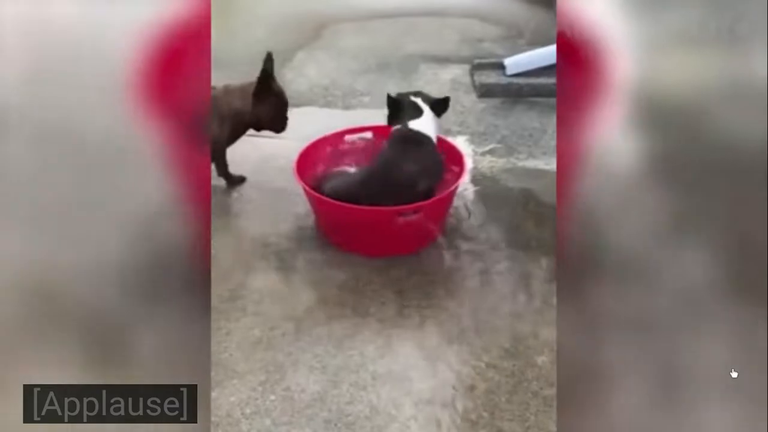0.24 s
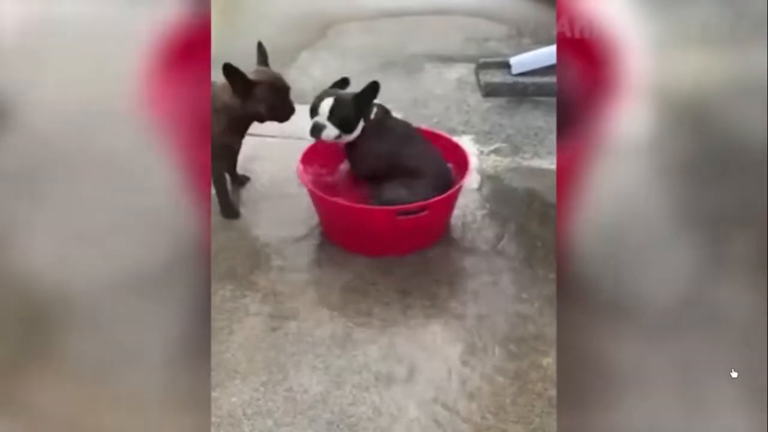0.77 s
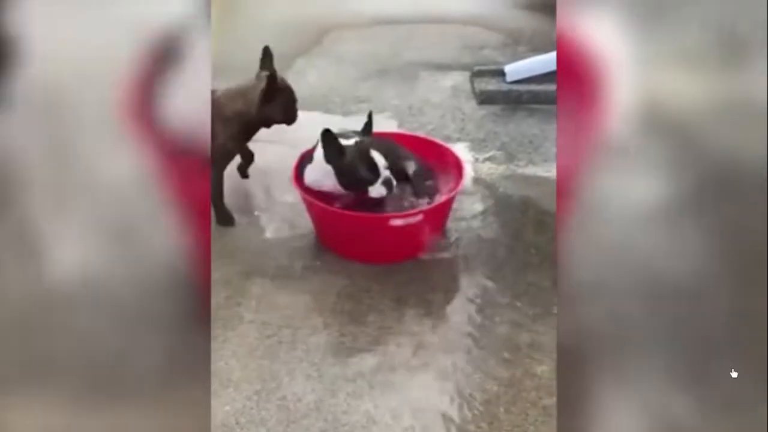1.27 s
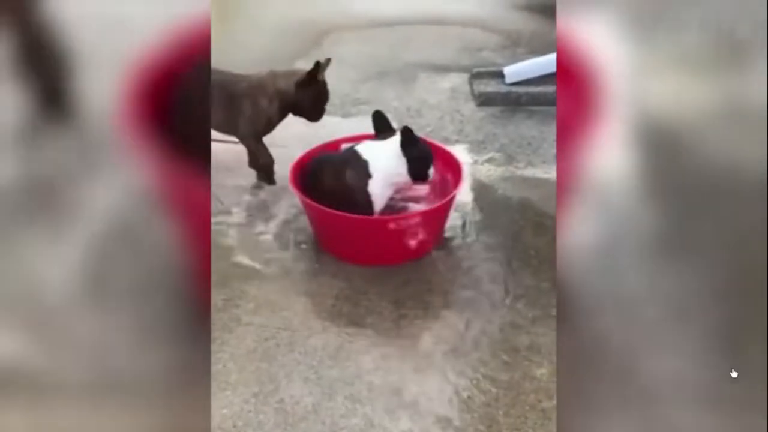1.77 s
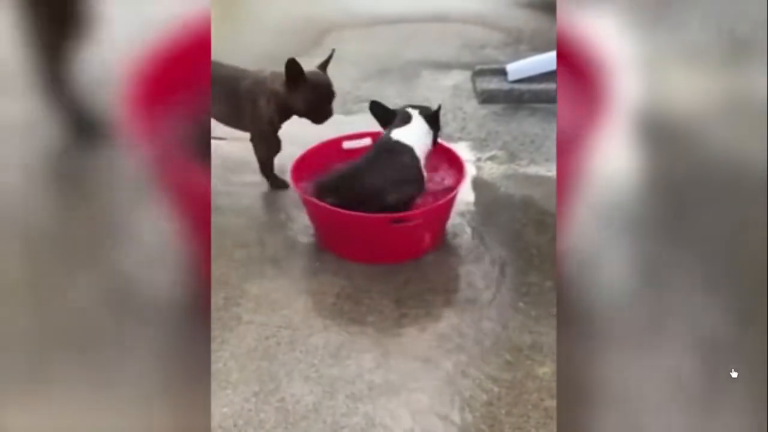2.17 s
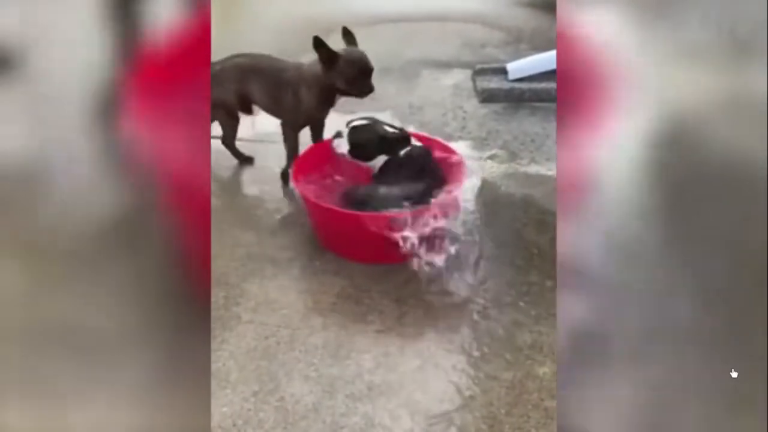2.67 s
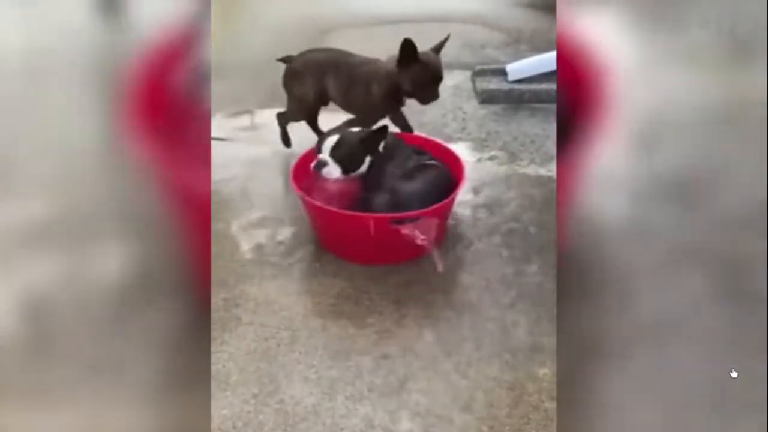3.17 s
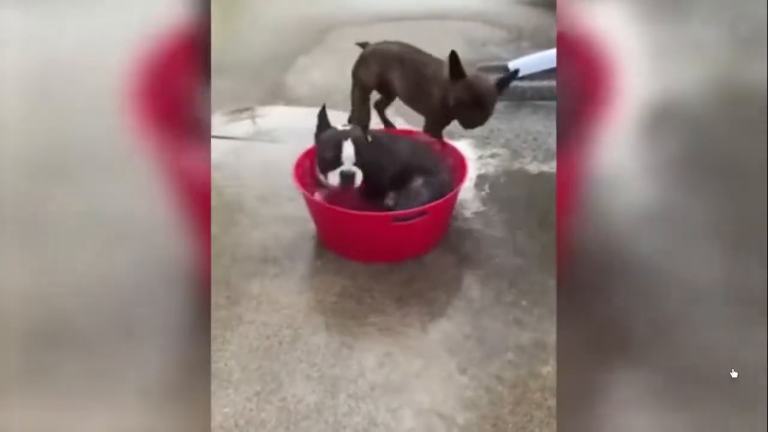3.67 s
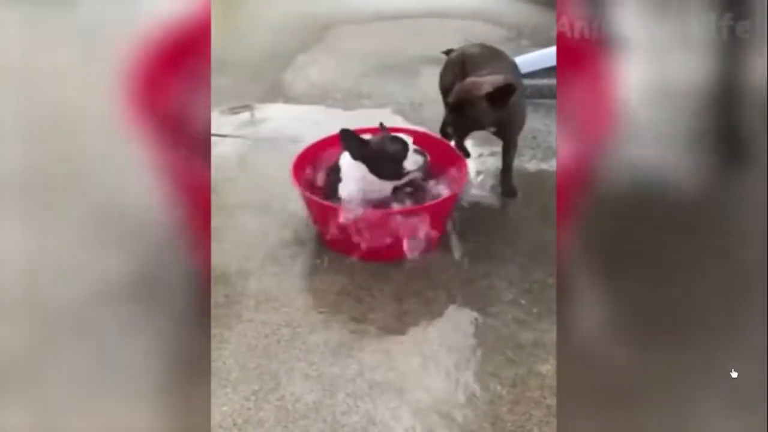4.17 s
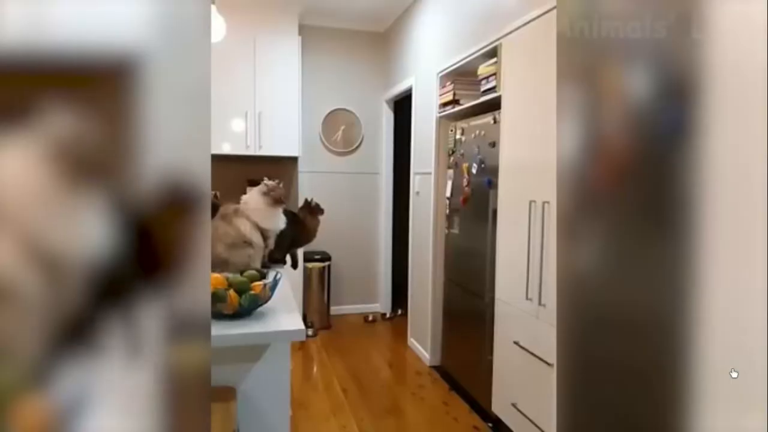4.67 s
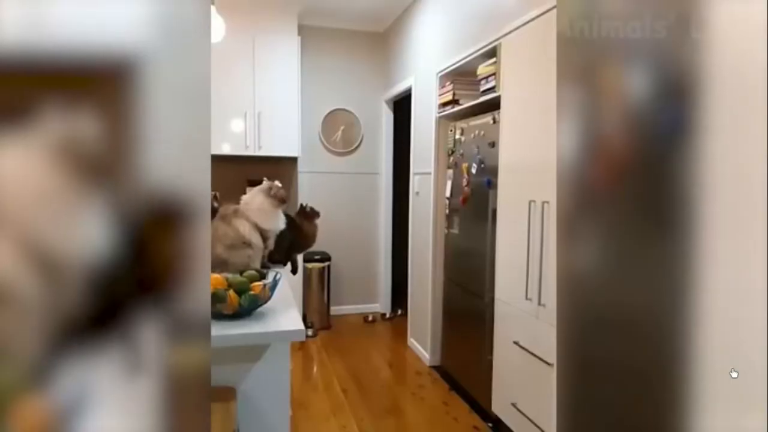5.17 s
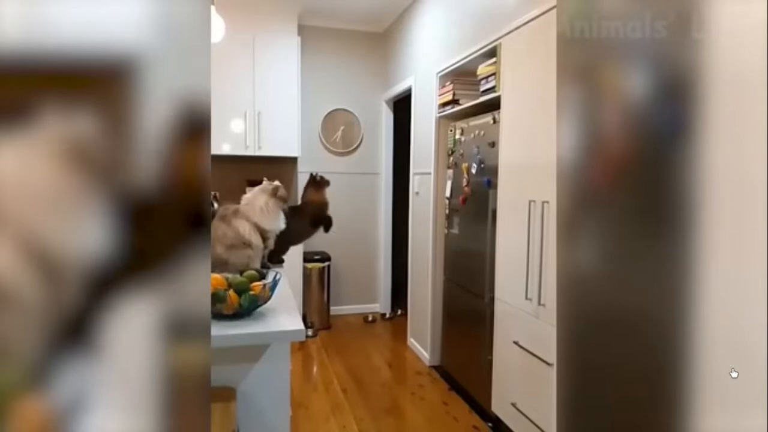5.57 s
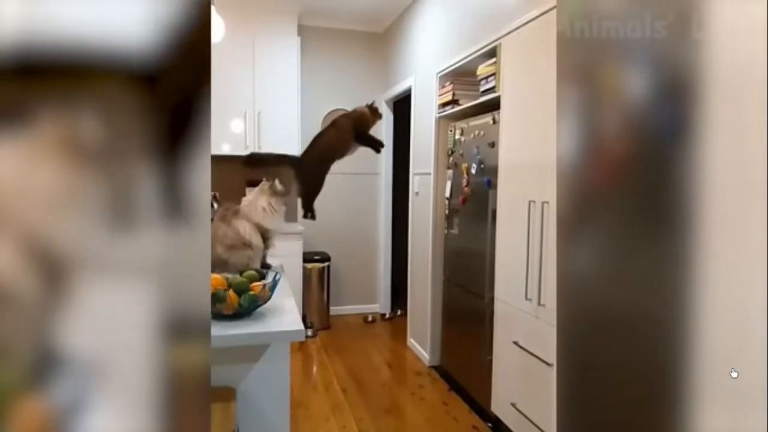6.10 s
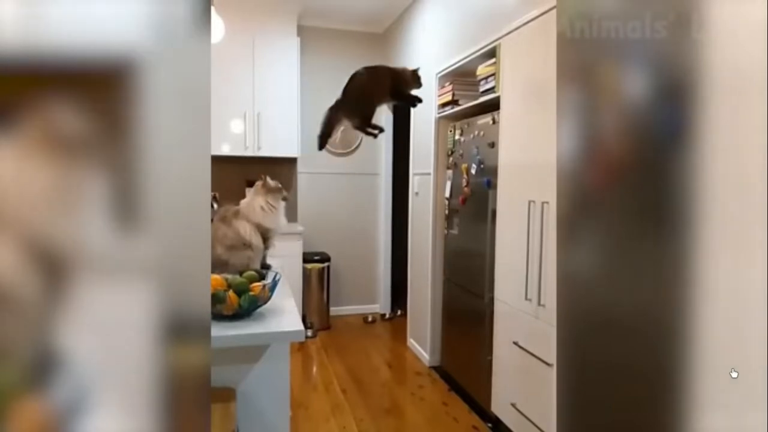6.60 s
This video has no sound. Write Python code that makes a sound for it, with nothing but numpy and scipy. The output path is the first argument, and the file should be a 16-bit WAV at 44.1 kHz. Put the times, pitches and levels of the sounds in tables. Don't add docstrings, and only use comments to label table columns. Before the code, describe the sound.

Loud, distorted splashing, gulping and sloshing in a little tub outdoors, suddenly giving way to quiet room tone with faint stirring.

```python
import sys
import numpy as np
from scipy import signal
from scipy.fft import rfft, irfft, next_fast_len
from scipy.io import wavfile
from scipy.ndimage import uniform_filter1d

SR = 44100
rng = np.random.default_rng(int(sys.argv[2]) if len(sys.argv) > 2 else 0)


def transcribe(signal):
    frames = np.atleast_2d(signal).T
    limited = np.clip(frames, -1, 1)
    pcm = np.round(limited * 32767).astype(np.int16)
    wavfile.write(sys.argv[1], SR, pcm)


def ratio(d):
    e = np.asarray(d, float) / 20
    return 10 ** e


N = 301644
TIME = np.arange(N) / SR
CUT_S = 4.745
EDGE_HZ = 12150
SURGE_STEP = 64
CALM_CHURN_DB = -23.5

# crest in seconds, churn level in dB,
# dying time in seconds, centre of the churn in Hz.
SHOVES = [(0.02, -21.5, 0.04, 1800.0), (0.1, -25.5, 0.031, 1510), (0.3, -21, 0.18, 2170),
          (0.438, -12, 0.1, 1750), (0.476, -29, 1, 1726), (0.56, -17.5, 0.092, 1093),
          (0.656, -13, 0.034, 2190.0), (0.79, -16.5, 0.048, 1050.0), (0.882, -12, 0.053, 1267),
          (1.086, -20, 0.016, 1667), (1.217, -22.5, 0.8, 1294), (1.528, -15, 0.14, 1764),
          (1.807, -18, 0.14, 1242), (2.005, -12, 0.058, 2040.0), (2.28, -22.5, 0.46, 1276),
          (2.482, -13, 0.097, 2000), (2.649, -15.5, 0.14, 1093), (2.839, -15.5, 0.49, 1506),
          (3.034, -7, 0.044, 2156), (3.122, -13, 0.14, 1630), (3.24, -17.5, 0.067, 2000.0),
          (3.4, -21.5, 0.092, 2800.0), (3.57, -17.5, 0.08, 2750.0), (3.689, -14, 0.053, 890),
          (3.823, -13, 0.13, 1678), (4.07, -17, 0.075, 1660), (4.21, -11.5, 0.084, 2457),
          (4.285, -16.5, 0.1, 1534), (4.396, -17, 0.022, 2117), (4.5, -8, 0.031, 2056),
          (4.623, -16, 0.45, 1948)]


def evened(x):
    return x / np.sqrt(np.mean(x ** 2) + 1e-20)


def read(points, hz):
    f, value = np.transpose(points)
    return np.interp(np.log(hz + 1), np.log(f + 1), value)


def colour(x, points):
    size = next_fast_len(x.shape[-1])
    gain = ratio(read(points, np.fft.rfftfreq(size, 1 / SR)))
    return irfft(rfft(x, size) * gain, size)[..., :x.shape[-1]]


def low_pass(x, hz):
    taps = signal.firwin(511, hz, window=("kaiser", 9), fs=SR)
    return signal.oaconvolve(x, taps[None], "same", axes=1)


def add(mix, s, sound):
    part = mix[max(round(s * SR), 0):][:len(sound)]
    part += sound[:len(part)]


def resonate(x, hz, width_hz):
    turn = np.exp(2j * np.pi * np.cumsum(hz) / SR)
    r = np.exp(-np.pi * width_hz / SR)
    return 2 * (turn * signal.lfilter([1 - r], [1, -r], x / turn)).real


def flicker(rate_hz):
    slow = signal.butter(2, rate_hz, fs=SR, output="sos")
    return evened(signal.sosfilt(slow, rng.standard_normal(N)))


def scrambled(x, size):
    z = signal.stft(x, nperseg=size)[2]
    z = z * np.exp(2j * np.pi * rng.random(z.shape))
    y = signal.istft(z, nperseg=size)[1][:N]
    return evened(y) * np.sqrt(np.mean(x ** 2))


def patchy(x, depth_db):
    z = signal.stft(x, nperseg=512)[2]
    blotch = uniform_filter1d(rng.standard_normal(z.shape), size=14, axis=0)
    blotch = evened(uniform_filter1d(blotch, size=14, axis=1))
    return evened(signal.istft(z * ratio(depth_db * blotch), nperseg=512)[1][:N])


def puffs(rows):
    out = np.zeros(N)
    for s, length_s, hz, width_hz, db in rows:
        hz = np.full(round(length_s * SR), hz)
        ring = resonate(rng.standard_normal(len(hz)), hz, width_hz)
        ring = resonate(ring, hz, width_hz)
        add(out, s, ratio(db) * evened(ring) * signal.windows.tukey(len(hz), .5))
    return out


def bubble(hz, cycles, rise, swell=0.047):
    length_s = max(cycles, 1.5) / hz
    u = np.arange(round(3.3 * length_s * SR)) / (length_s * SR)
    shape = (1 - np.exp(-u / swell)) * np.exp(-(u / 0.96) ** 2)
    return shape / shape.max() * np.sin(2 * np.pi * hz * length_s * (u + rise * u ** 2 / 2))


def swarm(lo_hz, hi_hz, cycles, per_s, spread_db, clump):
    out = np.zeros(N)
    busy = np.exp(clump * flicker(25.))
    pitches_hz = np.geomspace(lo_hz, hi_hz, num=32)
    for hz in pitches_hz:
        hits = rng.random(N) < busy * per_s / len(pitches_hz) / SR
        size_db = spread_db * np.minimum(rng.exponential(1, N), 4)
        size = hits * rng.choice([-1, 1], N) * ratio(size_db)
        one = bubble(hz, cycles * rng.uniform(1.0, 1.276), 0.249)
        out += hz * signal.oaconvolve(size, one)[:N]
    return evened(out)


def surges(rows):
    build_ratio, die_db = 1.3, -19.5
    crest_s, db, dying_s = np.asarray(rows)[:, :3, None].transpose(1, 0, 2)
    late = (TIME[::SURGE_STEP] - crest_s) / np.maximum(dying_s, .01)
    return ratio(2 * db + 2 * die_db * np.where(late < 0, late / build_ratio, late) ** 2)


def surge_db(rows, calm_db):
    power = surges(rows).sum(axis=0) + ratio(2 * calm_db)
    return np.repeat(10 * np.log10(power), SURGE_STEP)[:N]


def churn():
    # frequency in Hz, level in dB per Hz.
    churn_spectrum = [(150, -49.5), (250, -35.5), (396, -13.5), (520, -30), (800, -9), (1230, -1.5),
                      (1420, -6), (2190, 0), (4200, -17.5), (5460, -27.5), (9240, -120)]
    calm_hz = 1540
    power, calm = surges(SHOVES), ratio(2 * CALM_CHURN_DB)
    centre_hz = np.asarray(SHOVES)[:, 3] @ power + calm_hz * calm
    centre_hz = centre_hz / (power.sum(axis=0) + calm)
    centre_hz = np.interp(TIME, TIME[::SURGE_STEP], centre_hz)
    bubbles = swarm(299.0, 4557, 10.67, 2200, 2.2, .35)
    fizz = evened(colour(bubbles + 0.73 * rng.standard_normal(N), churn_spectrum))
    hollow = evened(resonate(fizz, centre_hz, 440.0))
    return ratio(surge_db(SHOVES, CALM_CHURN_DB) - 3.0) * evened(fizz + 0.68 * hollow)


def pops():
    # start in seconds, peak in dB, pitch in Hz, length in cycles.
    plop_rows = [(0.147, -9, 1185, 13), (0.428, -8.5, 962, 22), (0.454, 4.5, 1520, 7), (0.637, 0, 985, 3.7),
                 (0.842, -12, 826, 21), (0.866, 2.5, 1260, 6.4), (1.078, -2, 1510, 7.1),
                 (1.145, -5.5, 1300, 4.3), (1.169, 4.5, 1293, 13), (1.431, -4, 1570, 7.5),
                 (1.533, -3.5, 1470, 5), (1.573, -1, 1564, 14), (1.734, -10, 1090, 6.9),
                 (1.807, -1, 1233, 21), (2.256, -11.5, 890, 15), (2.279, 6.5, 1243, 6.7),
                 (2.338, 1.5, 1100, 5.3), (2.405, 0, 1074, 10.7), (2.48, 0, 1430, 3.9),
                 (2.583, -1, 944, 2.7), (2.622, -8.5, 784, 8.1), (2.669, -1.5, 1063, 20),
                 (2.775, 0, 1385, 4.3), (2.853, -3, 1170, 17), (2.923, -0.5, 1270, 5),
                 (3.054, -1.5, 840, 4.5), (3.123, 2, 934, 3.7), (3.163, 7.5, 1134, 7.8),
                 (3.682, -4, 1200, 3.2), (4.137, -4.5, 1120, 8.8)]
    # start in seconds, peak in dB, pitch in Hz, length in cycles.
    gulp_rows = [(0.359, -16.5, 637, 10), (1.098, -28.5, 424, 12), (1.51, -12, 395, 3.4),
                 (2.412, -19, 583, 15), (2.536, -23, 309, 7.1), (2.6, -18.5, 474, 6.2),
                 (2.656, -7, 617, 11), (3.679, -4.5, 629, 17), (3.839, -21.5, 587, 19),
                 (4.098, -14.5, 393, 4.4), (4.289, -15.5, 656, 20)]
    # start in seconds, peak in dB, pitch in Hz.
    ping_rows = [(0.087, -3.5, 1692), (0.341, -3.5, 1700), (0.361, 2, 2140), (0.477, 7, 1630),
                 (0.928, 1, 2760), (1.061, -5.5, 2270), (1.247, 0, 1970), (1.349, -4, 2240),
                 (1.401, -4.5, 2970), (1.668, -3.5, 2240), (1.915, 5.5, 2320), (2.373, -3, 2350),
                 (2.445, -3.5, 2580), (2.496, 7, 2200), (2.529, 1.5, 2380), (3.025, 8, 2370),
                 (3.053, 4, 2000), (3.087, 6.5, 2240), (3.244, 0, 2020), (3.365, -1, 2610),
                 (3.763, -1.5, 1720), (4.004, -8, 1640), (4.218, 3, 2490), (4.268, 2, 1580),
                 (4.468, 4.5, 1990), (4.499, 4.5, 2130), (4.579, -2, 2560), (4.612, 4.5, 2190),
                 (4.677, 5, 1980), (4.715, 0, 1910)]
    # start in seconds, peak in dB, pitch in Hz.
    more_ping_rows = [(0.1911, -4, 3200), (0.2882, -13.5, 2250), (0.6448, -4.5, 2430), (0.8587, -5.5, 2110),
                      (1.0815, -2.5, 1900), (1.2312, -6.5, 2010), (1.8105, -0.5, 1640), (1.9517, -4.5, 3730),
                      (2.4032, -4, 1480), (2.4287, -7, 2010), (2.4807, -4, 2180), (2.606, 0, 1640),
                      (2.647, -0.5, 2960), (2.998, 2, 2370), (3.1622, 0, 1880), (3.3366, -4.5, 1960),
                      (3.4775, -9, 2140), (3.529, -12.5, 2320), (3.558, -14, 1890), (3.6005, -2.5, 2970),
                      (3.7472, -5, 1670), (3.796, 3, 1750), (3.8154, 5, 1670), (3.8272, 3, 1680),
                      (3.853, -7.5, 1730), (3.8813, -2.5, 1700), (4.044, -3, 1580), (4.1787, -8, 2400),
                      (4.294, -2, 1674), (4.3763, -5, 1670), (0.3, -2.5, 2260), (0.4004, 0, 2100),
                      (0.424, -4.5, 2000), (0.494, -2.5, 1970), (1.03, -12, 2980), (1.472, -1.5, 2840),
                      (1.507, -3.5, 2390), (3.3996, -5, 2900), (3.4308, -4.5, 3000), (3.459, -10.5, 1630),
                      (3.495, -8, 1970), (3.5357, -9, 2330)]
    # start in seconds, peak in dB, pitch in Hz.
    bloop_rows = [(0.087, -5.5, 1090), (0.11, -4, 1150), (0.279, -15, 1180), (0.345, -12, 1080),
                  (0.359, -5.5, 1110), (0.477, 0, 1150), (0.853, -6.5, 1270), (0.927, -3.5, 910),
                  (1.076, -7.5, 1260), (1.156, -4.5, 1270), (1.449, -12, 929), (1.472, -10.5, 1230),
                  (1.505, -5.5, 1100), (1.556, -7, 937), (1.648, -6.5, 1230), (1.787, -7, 1190),
                  (2.072, -11, 1160), (2.268, -0.5, 1250), (2.531, -9.5, 1080), (3.319, -5.5, 1470),
                  (4.041, -13.5, 1500), (4.273, -1.5, 1210), (4.495, -12.5, 891), (4.687, -5, 1290)]
    ping_s, bloop_cycles = 0.0041, 5.9
    rows = [*plop_rows, *gulp_rows]
    rows += [(s, db, hz, hz * ping_s) for s, db, hz in ping_rows]
    rows += [(s, db + 1, hz, hz * ping_s) for s, db, hz in more_ping_rows]
    rows += [(s, db - 1, hz, bloop_cycles) for s, db, hz in bloop_rows]
    out = np.zeros(N)
    smack_decay = ratio(-60 * np.arange(200) / SR / 0.0061)
    for s, db, hz, cycles in rows:
        rise = rng.uniform(0.048, 0.24)
        smack = rng.standard_normal(200) * smack_decay
        add(out, s, ratio(db - 5.0) * bubble(hz / (1 + rise / 2), cycles, rise, swell=0.058))
        add(out, s, ratio(db - 10.5) * uniform_filter1d(smack, size=5))
    return out


def impacts():
    # start in seconds, peak in dB.
    slap_rows = [(0.1456, -8.5), (0.2793, -2), (0.2960, -5.5), (0.4753, 1), (0.6265, -6.5), (0.7790, 0.5),
                 (0.8579, -2), (1.2062, 4), (1.5329, -2.5), (1.9126, 0.5), (1.9435, -3.5), (2.2273, -8.5),
                 (2.6623, 1), (2.8654, -19), (2.9876, 4), (3.018, 2), (4.1041, 1), (4.4657, 4.5),]
    # start in seconds, peak in dB.
    crack_rows = [
        (0.6828, 12),
        (0.8315, 7),
        (0.9188, 11.5),
        (1.0605, 7),
        (1.1628, 9.5),
        (2.1076, 7),
        (2.5282, 6.5),
    ]
    # start in seconds, peak in dB.
    spatter_rows = [(0.119, -1.5), (0.4753, -5), (0.5316, -2.5), (0.644, -5), (1.2076, -1), (1.5353, -3.5),
                    (1.624, -1.5), (1.7342, -6.5), (1.912, -1.5), (2.519, -6), (2.586, -3), (2.6462, -9),
                    (2.8646, -9.5), (2.894, -3), (3.3307, -0.5), (3.365, -3.5), (3.4396, -6), (3.449, -4),
                    (3.4992, -1.5), (3.518, -14.5), (3.53, -5), (3.5848, 2.5), (4.146, 0.5), (4.3044, -6),
                    (4.3997, 3.5), (4.467, -5)]
    out = np.zeros(N)
    t = np.arange(SR // 5) / SR
    for rows, t60_s, gain_db in ((slap_rows, 0.039, 0), (crack_rows, 0.013, 0), (spatter_rows, 0.015, 4)):
        for s, db in rows:
            add(out, s, ratio(db + gain_db - 60 * t / t60_s) * (1 - np.exp(-t / 0.00038)))
    return out


def spray():
    # crest in seconds, spray level in dB, dying time in seconds.
    spill_rows = [(0.04, -29, 0.1), (0.155, -18.5, 0.036), (0.22, -18, 0.1), (0.31, -14.5, 0.099),
                  (0.4, -12.5, 0.085), (0.49, -15, 0.032), (0.665, -17.5, 0.027), (0.71, -20.5, 0.058),
                  (0.8, -18, 0.042), (0.87, -15.5, 0.062), (0.94, -28, 0.025), (1.235, -20, 0.068),
                  (1.452, -16, 0.11), (1.478, -22.5, 0.51), (1.599, -19, 0.12), (1.745, -22, 0.011),
                  (1.979, -12.5, 0.083), (2.05, -18, 0.059), (2.116, -18, 0.023), (2.258, -15, 0.064),
                  (2.467, -25, 0.36), (2.683, -22, 0.021), (2.89, -18, 0.18), (3.03, -14, 0.082),
                  (3.12, -8, 0.088), (3.25, -17.5, 0.079), (3.385, -16, 0.058), (3.44, -20, 0.059),
                  (3.59, -19, 0.1), (3.804, -21, 0.13), (3.98, -38, 0.059), (4.15, -24, 0.041),
                  (4.282, -17.5, 0.22), (4.58, -12, 0.14), (4.688, -18, 0.08)]
    # frequency in Hz, level in dB per Hz.
    spray_spectrum = [(3240, -43.5), (5500, -14.5), (5720, -9), (6270, -4), (7280, -7.5), (7900, -2),
                      (9180, -0.5), (11100, -1.5), (12000, -9), (15600, -44.5), (22000, -120)]
    # frequency in Hz, level in dB per Hz.
    trickle_spectrum = [(1760, -16), (2700, -1), (3250, -5), (3560, -15), (3900, -7), (5600, -12.5),
                        (6100, -16), (7930, -27), (13400, -120)]
    slaps = impacts()
    spray_db = surge_db(spill_rows, -32)
    churn_db = surge_db(SHOVES, CALM_CHURN_DB)
    drip_db = -26 + 1.24 * (spray_db + 18.5) + 0.1 * (churn_db + 18)
    drops = swarm(5036, 13970, 4.6, 5000, 3.8, .6) + 1.21 * rng.standard_normal(N)
    drips = swarm(2470, 5620, 5.15, 1400, 1.8, .55) + 1.15 * rng.standard_normal(N)
    high = (ratio(spray_db) + ratio(-12.0) * slaps) * patchy(colour(drops, spray_spectrum), 1.76)
    low = (ratio(drip_db) + ratio(-22.5) * slaps) * patchy(colour(drips, trickle_spectrum), 1.8)
    return high + low


def slosh():
    # crest in seconds, level in dB, dying time in seconds.
    slosh_rows = [(.13, -29.5, 0.073), (.43, -34, 0.032), (.77, -27, 0.054), (.9, -21, 0.11),
                  (1.52, -27, 0.032), (2.27, -25, 0.06), (2.62, -17, 0.08), (2.87, -23.5, 0.14),
                  (3.12, -23.5, 0.2), (3.4, -27, 0.034), (3.53, -27.5, 0.08), (3.6, -23, 0.11),
                  (3.74, -22.5, 0.14), (3.85, -29, 0.15), (4.1, -28, 0.18), (4.3, -25, 0.049),
                  (4.43, -27, 0.046), (4.6, -31.5, 0.34)]
    # frequency in Hz, level in dB per Hz.
    slosh_spectrum = [(300, -24.5), (560, -14), (800, -3.5), (1000, -1), (1400, -24.5)]
    rolls = swarm(499.7, 1093, 8.8, 300, 1.7, .4) + .5 * rng.standard_normal(N)
    return ratio(surge_db(slosh_rows, -36)) * evened(colour(rolls, slosh_spectrum))


def squeaks_and_jets():
    # start in seconds, length in seconds, centre in Hz, width in Hz, level in dB.
    squeak_rows = [
        (3.74, 0.14, 1674, 258, -11.5),
        (3.745, 0.14, 3210, 259.4, -18),
        (3.745, 0.041, 2770, 230, -21),
    ]
    # start in seconds, length in seconds, centre in Hz, width in Hz, level in dB.
    jet_rows = [
        (2.2, .11, 7200, 3000, -20),
        (4.051, 0.012, 3360, 2500, -21),
        (4.575, 0.018, 4030, 400, -19.5),
        (4.576, .025, 2770, 1190, -11.5),
    ]
    return puffs([*squeak_rows, *jet_rows])


def yard_echoes(x):
    # frequency in Hz, side over mid in dB.
    side_spectrum = [(170, -15), (520, -23), (860, -23), (1200, -12), (1900, -18), (2250, -24), (2700, -13),
                     (3600, -2), (4100, -7), (5500, -1), (6100, -13), (7300, -5), (8000, -11),
                     (9500, -15.5)]
    # frequency in Hz, left over right in dB.
    lean_rows = [(900, .3), (1200, 2), (1600, -.5), (2250, 0), (2600, 3.5), (3250, -1), (3650, -5),
                 (4400, .5), (5200, -4), (6200, 1.5), (8500, -1), (9400, 0), (10000, -2.5)]
    # frequency in Hz, phase by which left leads in radians.
    lead_rows = [(2500, 0), (2900, -.75), (3300, -1), (3900, .5), (4300, .1), (5000, .9), (5800, -.2),
                 (6700, -.3), (8800, .3), (9200, 0)]
    t = np.arange(SR // 10) / SR
    tails = rng.standard_normal((6, len(t))) * ratio(-60 * t / 0.1)
    mid = x.copy()
    for k, tail in enumerate(tails):
        turn = np.cos(np.pi * (2.284 * TIME + k / len(tails))) / np.sqrt(3)
        mid += ratio(-8.) * signal.oaconvolve(x * turn, tail / np.linalg.norm(tail))[:N]
    side = colour(scrambled(mid, size=128), side_spectrum)
    hz = np.fft.rfftfreq(N, 1 / SR)
    port = ratio(read(lean_rows, hz) / 2) * np.exp(.5j * read(lead_rows, hz))
    return np.array([irfft(rfft(mid + side) * port, N), irfft(rfft(mid - side) / port, N)])


def motor():
    # time in seconds, third order in Hz, level in dB.
    motor_rows = [(0, 152, -51), (.9, 152, -75), (1.1, 152, -44), (1.5, 146, -53.5), (1.95, 143, -57),
                  (2.1, 143, -42), (2.7, 150, -39), (2.9, 155, -47.5), (3.7, 140, -46), (4., 143, -39.5),
                  (4.76, 148, -33.5)]
    # engine order, level in dB.
    order_rows = [(2, -16.5), (3, 1), (4, -18), (5, -17)]
    at_s, third_hz, motor_db = np.transpose(motor_rows)
    turn_hz = np.interp(TIME, at_s, third_hz) / 3 * (1 + 0.0297 * flicker(12.))
    turns = np.cumsum(turn_hz) / SR
    orders = sum(ratio(db + 2.0 * flicker(9.1)) * np.sin(2 * np.pi * k * turns) for k, db in order_rows)
    return ratio(np.interp(TIME, at_s, motor_db) + 3.0) * orders


def air(points, same, patchy_db, swell_db):
    frames, hz = N // 512 + 5, np.fft.rfftfreq(2048, 1 / SR)
    a, b, c, d, patches = rng.standard_normal((frames, 1025, 5)).T
    patches = uniform_filter1d(patches, size=12, axis=0)
    patches = evened(uniform_filter1d(patches, size=9, axis=1))
    swell = evened(uniform_filter1d(rng.standard_normal(frames), size=8))
    same = np.clip(read(same, hz), -1, 1)[:, None]
    left = a + 1j * b
    right = same * left + np.sqrt(1 - same ** 2) * (c + 1j * d)
    z = np.array([left, right])
    z *= ratio(read(points, hz)[:, None] + patchy_db * patches + swell_db * swell)
    return evened(signal.istft(z, nperseg=2048, noverlap=1536)[1][:, :N])


def yard_air():
    # frequency in Hz, level in dB per Hz.
    yard_spectrum = [(8.8, -29.5), (18, -4), (42, -1), (60, -12.5), (157, -10), (280, -20), (392, -6.5),
                     (541, -16.5), (700, -40), (910, -28), (1540, -120)]
    likeness = [(25, 0.99), (60, 0.16), (125, 0.55), (300, 0.99)]  # Hz, left-right likeness
    return ratio(-33.5 - 3.5) * air(yard_spectrum, likeness, 3.5, 1.0)


def kitchen():
    # frequency in Hz, level in dB per Hz.
    kitchen_spectrum = [(8.8, -25), (15, -4), (45, -5.5), (197, -25), (430, -34.5), (732, -40), (1020, -30),
                        (1210, -47), (1390, -31.5), (1560, -34.5), (2300, -35.5), (3130, -40), (12000, -41),
                        (15600, -71), (22000, -120)]
    # frequency in Hz, left-right likeness from -1 to 1.
    kitchen_likeness = [(25, 0.66), (70, -0.01), (170, -0.33), (490, -0.086), (1400, 0.5), (4000, -0.15),
                        (11600, 0.06)]
    # centre in Hz, width in Hz, level in dB.
    appliance_rows = [(885, 27, -59.5), (1020, 94, -59.5), (1380, 45, -62)]
    # start in seconds, length in seconds, centre in Hz, width in Hz, level in dB.
    stir_rows = [(5.05, 0.082, 2360, 197, -52), (5.15, 0.064, 1590, 252, -44.5),
                 (5.27, 0.066, 2310, 402, -52.5), (5.33, 0.098, 1040, 121, -44),
                 (5.38, 0.13, 2400, 496, -50.5), (5.5, 0.089, 854, 100, -47),
                 (5.7, 0.088, 1480, 603, -52.5), (5.82, 0.089, 2720, 397, -52),
                 (5.84, 0.075, 8250, 1000, -54), (6., 0.11, 2310, 500, -51.5), (6.05, 0.17, 1410, 150, -52),
                 (6.32, 0.087, 1020, 250, -46.5), (6.43, 0.084, 1130, 100, -45),
                 (6.7, 0.084, 1395, 118, -50.5), (6.72, 0.16, 4580, 1200, -57), (5.07, .06, 3880, 900, -55)]
    whirr = np.zeros(N)
    for hz, width_hz, db in appliance_rows:
        band = evened(resonate(rng.standard_normal(N), np.full(N, hz), width_hz))
        whirr += ratio(db + 2 + 3.5 * flicker(6.5)) * band
    stir = ratio(-3.5 + 2.3 * flicker(30.)) * puffs(stir_rows)
    stir = stir + np.array([[.5], [-.5]]) * scrambled(stir, size=512)
    return ratio(-38) * air(kitchen_spectrum, kitchen_likeness, 2.54, 0.1) + whirr + stir


def top_band():
    room_gaps_s = [4.75, 4.88, 5.06, 5.39, 5.62, 5.83, 5.89, 6.1, 6.24, 6.38, 6.56, 6.83]
    # start in seconds, length in seconds, level in dB.
    tub_bursts = [(0.093, 0.049, -49.5), (0.56, 0.07, -47.5), (0.438, 0.09, -40), (0.608, 0.063, -47.5),
                  (0.672, 0.032, -19.5), (0.768, 0.032, -44.5), (0.844, 0.084, -36.5), (1.031, 0.07, -39),
                  (1.129, 0.087, -40), (1.464, 0.045, -41.5), (1.512, 0.036, -46.5), (1.722, 0.041, -48),
                  (1.893, 0.09, -36), (2.262, 0.056, -44), (2.348, 0.051, -47), (2.428, 0.045, -36.5),
                  (2.472, 0.041, -48), (2.52, 0.034, -40), (2.643, 0.055, -40), (2.853, 0.053, -39.5),
                  (2.975, 0.23, -34.5), (3.667, 0.061, -38.5), (3.787, 0.095, -40), (3.951, 0.053, -50),
                  (4.206, 0.055, -43), (4.384, 0.029, -46), (4.443, 0.069, -34.5), (4.557, 0.051, -44),
                  (4.629, 0.057, -41)]
    gap_s, edge_s = .035, .02
    hiss = rng.standard_normal((2, N))
    room = sum(np.clip(1.5 - abs(TIME - s) / gap_s * 2, 0, 1) for s in room_gaps_s)
    tub = np.zeros(N)
    for s, length_s, db in tub_bursts:
        inside_s = np.minimum(TIME - s, s + length_s - TIME)
        tub += ratio(db) * np.clip(inside_s / edge_s, 0, 1) ** 2
    whine_hz = np.full(N, 15620)
    whine = evened(resonate(resonate(hiss[0], whine_hz, 200.), whine_hz, 200.))
    scraps = np.array([patchy(one, 11.) for one in hiss])
    scraps = scraps + 0.57 * scraps[::-1]
    indoors = TIME > CUT_S
    opposed = ratio(-47.) * (1 - np.minimum(room, 1)) * indoors * hiss[1] * np.array([[1], [-1]])
    top = ratio(-46.) * room * hiss + ratio(2.) * tub * scraps + opposed
    return top - low_pass(top, EDGE_HZ) + ratio(-62.5) * whine * indoors


def scene():
    # frequency in Hz, gain in dB.
    notch_rows = [(5300, 0), (5600, -5), (5750, -16), (5900, -3), (6100, 0)]
    water = churn() + slosh() + spray() + pops() + squeaks_and_jets()
    tub = colour(yard_echoes(water), notch_rows) + motor() + yard_air()
    after = np.maximum(TIME - CUT_S, 0) / 0.04
    fade = np.maximum(ratio(-40. * after), ratio(-8.0 - 15.5 * after))
    return low_pass(tub * fade + kitchen() * np.clip(3 * after, 0, 1), EDGE_HZ) + top_band()


def roll_off(x):
    return signal.sosfilt(signal.butter(12, 15900, fs=SR, output="sos"), x)


def record(dry):
    flat = low_pass(np.clip(dry, -1, 1), 15900)
    return roll_off(flat)


dry = scene()
out = record(dry)
transcribe(out)
```